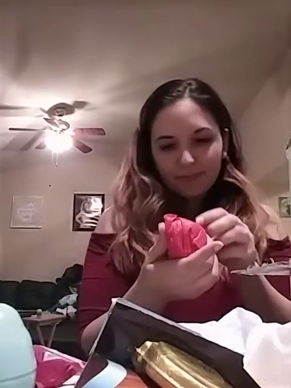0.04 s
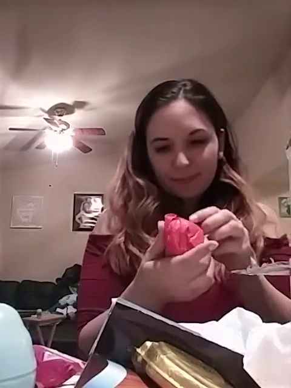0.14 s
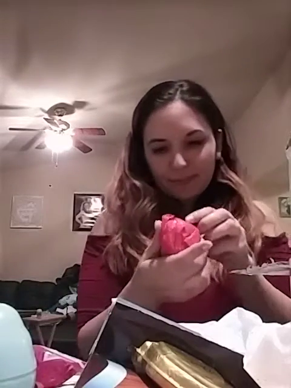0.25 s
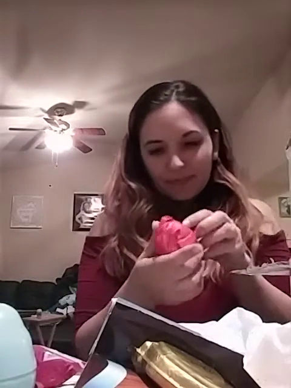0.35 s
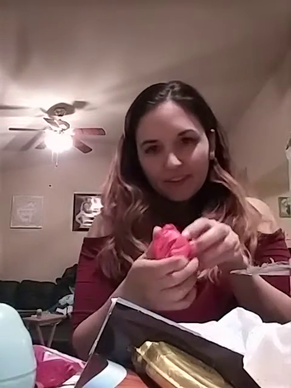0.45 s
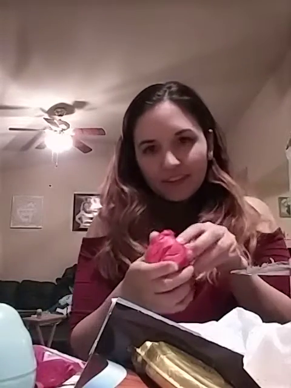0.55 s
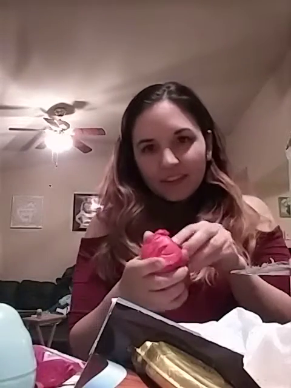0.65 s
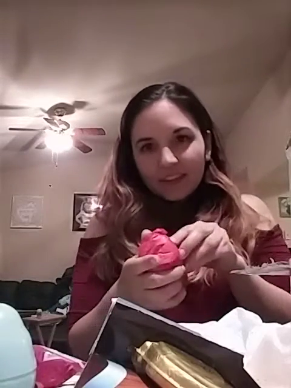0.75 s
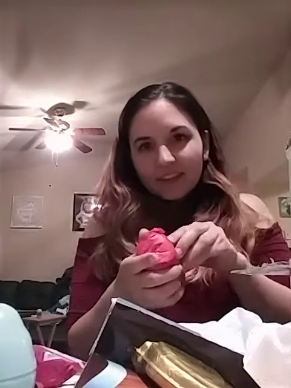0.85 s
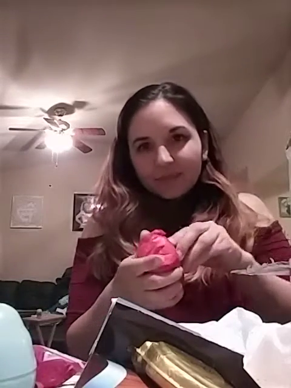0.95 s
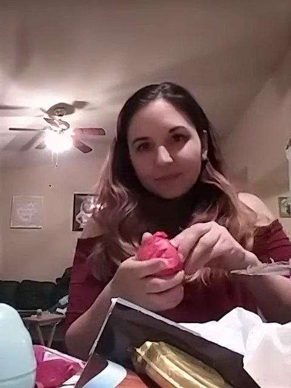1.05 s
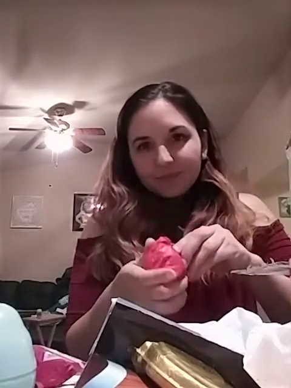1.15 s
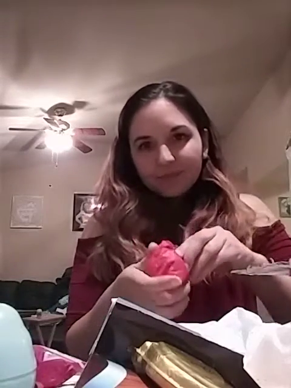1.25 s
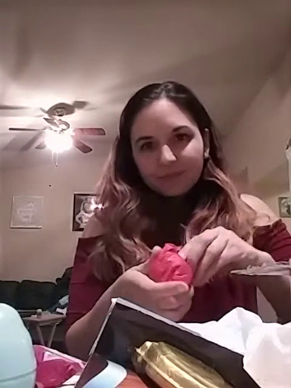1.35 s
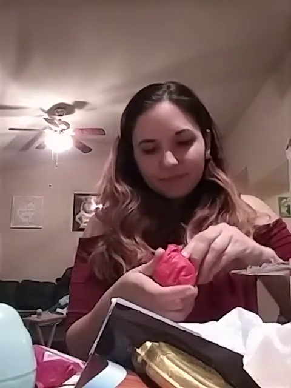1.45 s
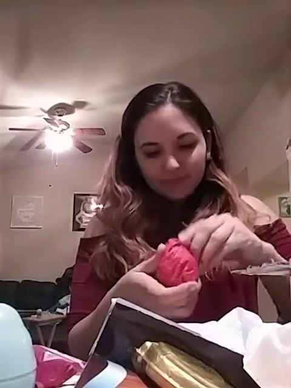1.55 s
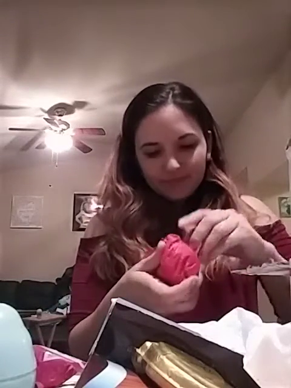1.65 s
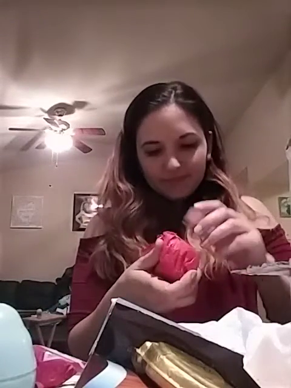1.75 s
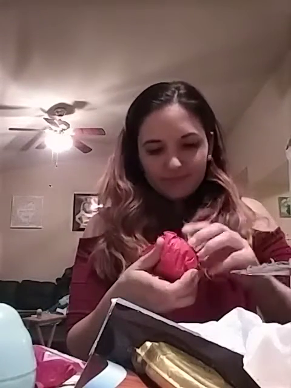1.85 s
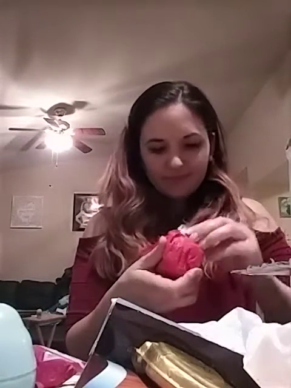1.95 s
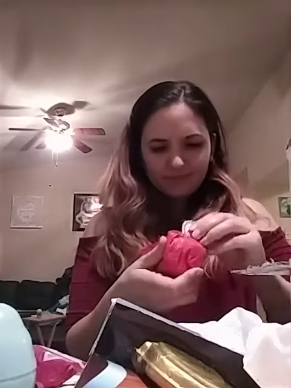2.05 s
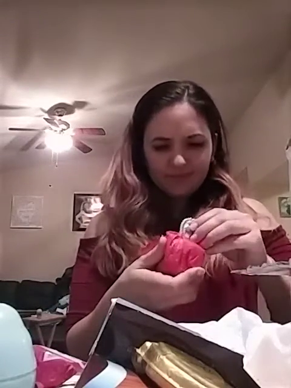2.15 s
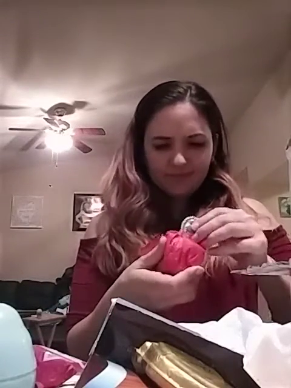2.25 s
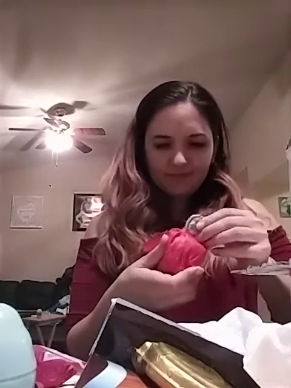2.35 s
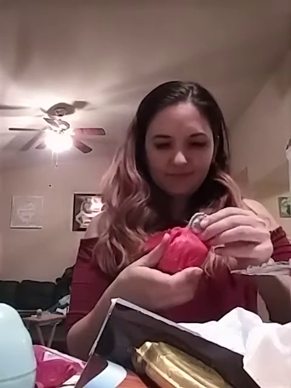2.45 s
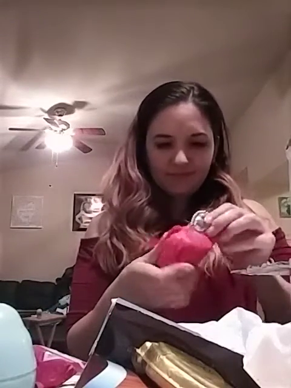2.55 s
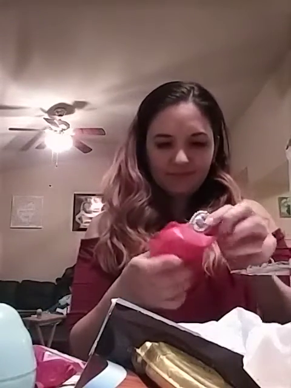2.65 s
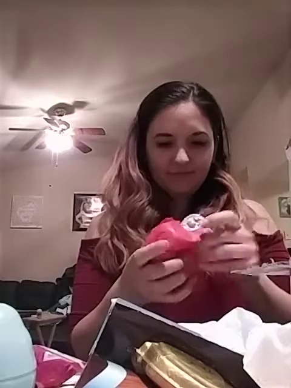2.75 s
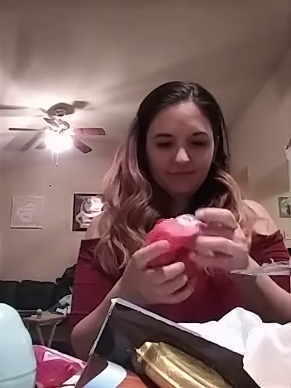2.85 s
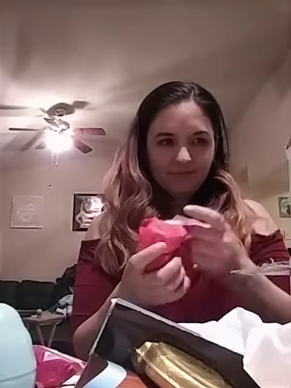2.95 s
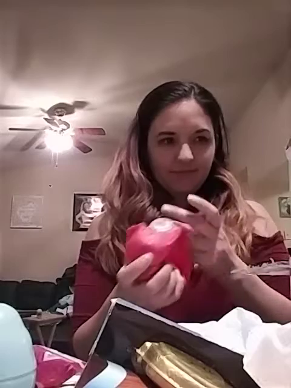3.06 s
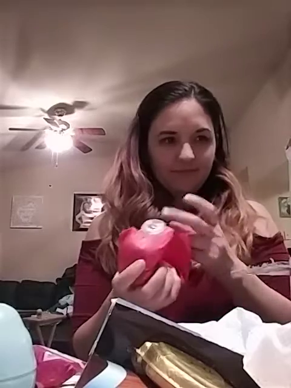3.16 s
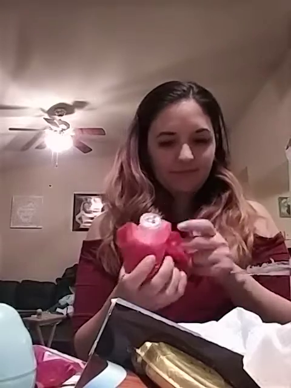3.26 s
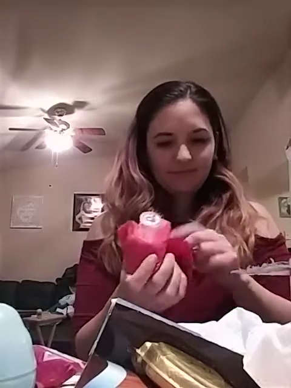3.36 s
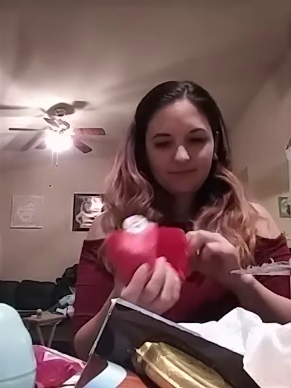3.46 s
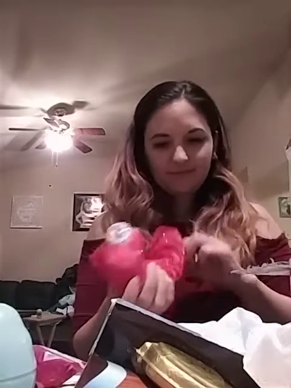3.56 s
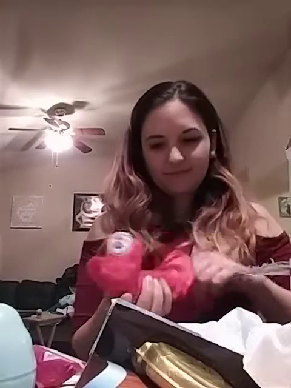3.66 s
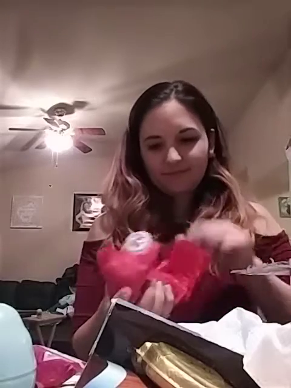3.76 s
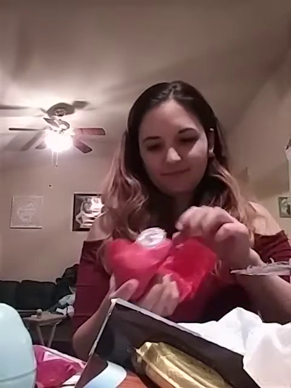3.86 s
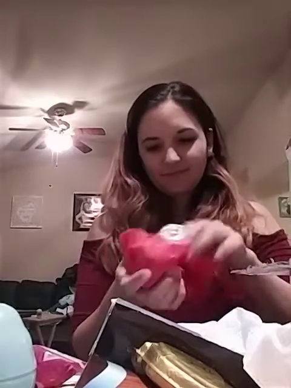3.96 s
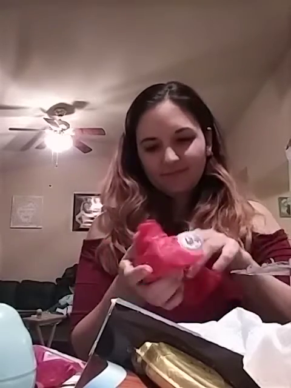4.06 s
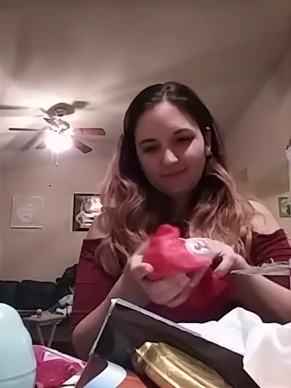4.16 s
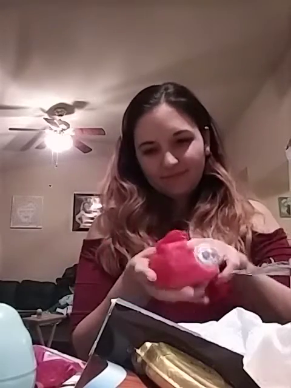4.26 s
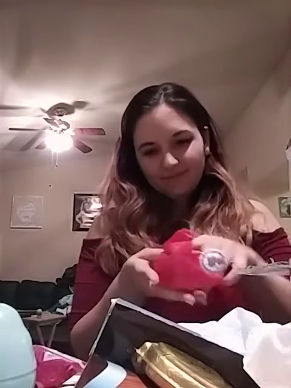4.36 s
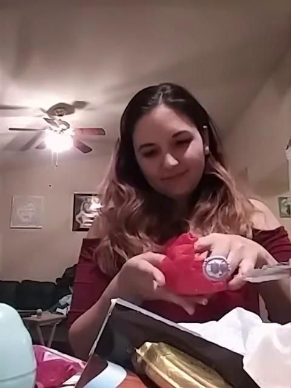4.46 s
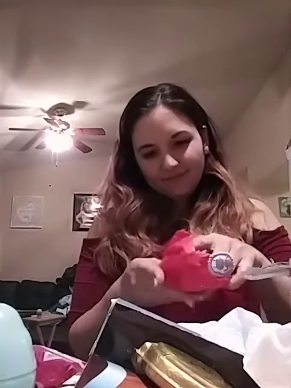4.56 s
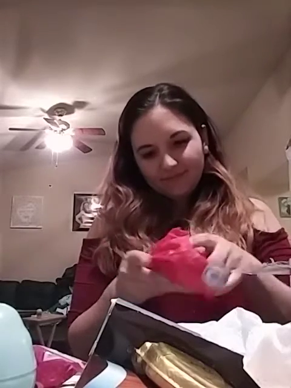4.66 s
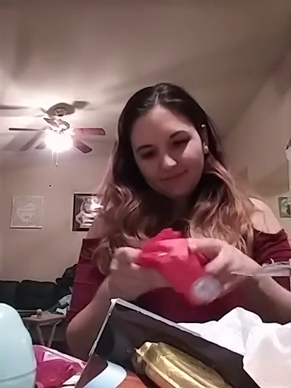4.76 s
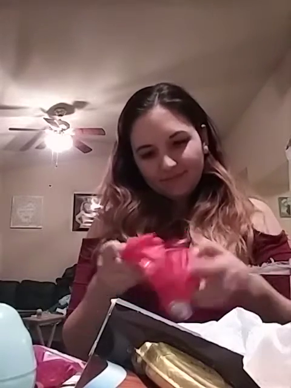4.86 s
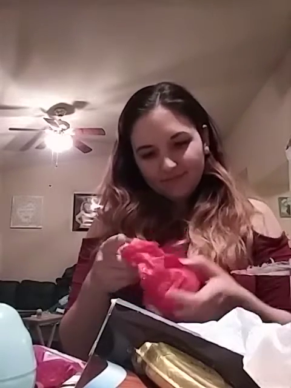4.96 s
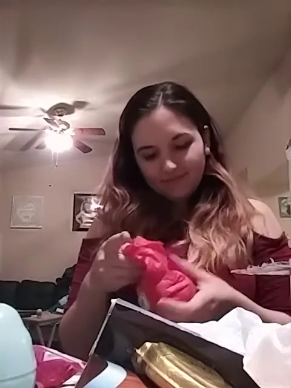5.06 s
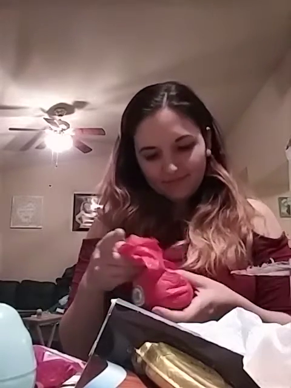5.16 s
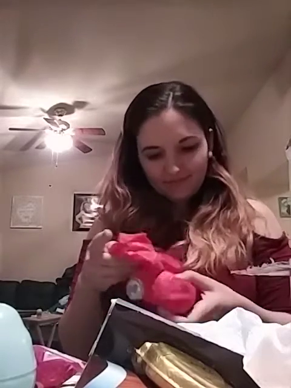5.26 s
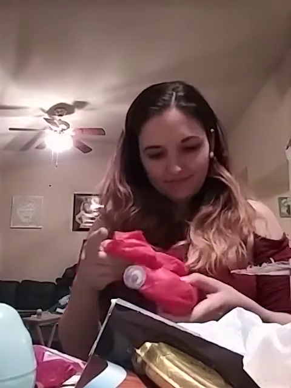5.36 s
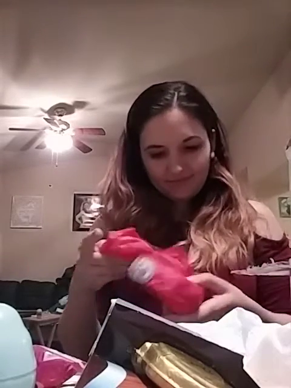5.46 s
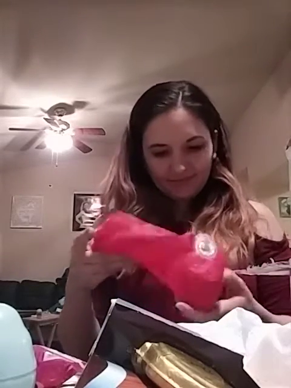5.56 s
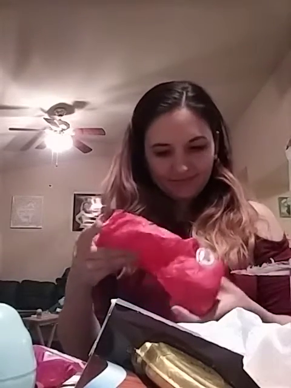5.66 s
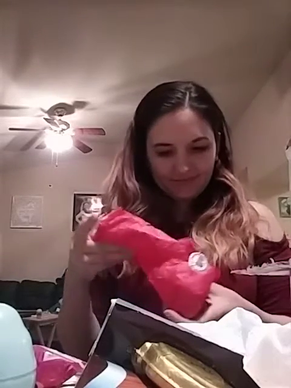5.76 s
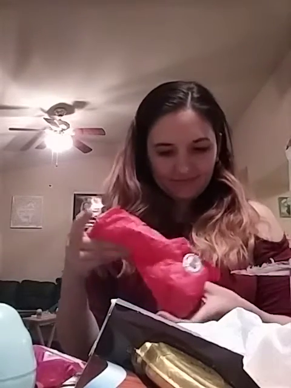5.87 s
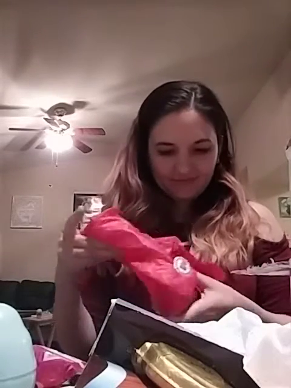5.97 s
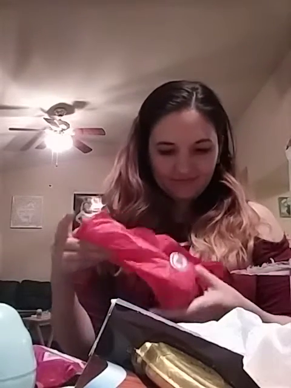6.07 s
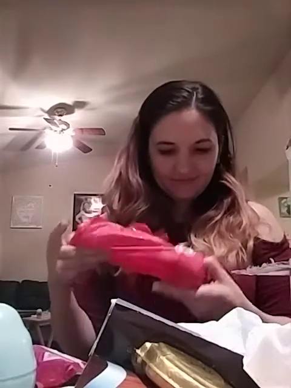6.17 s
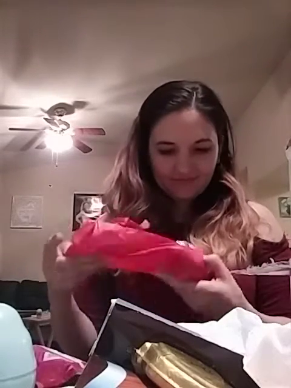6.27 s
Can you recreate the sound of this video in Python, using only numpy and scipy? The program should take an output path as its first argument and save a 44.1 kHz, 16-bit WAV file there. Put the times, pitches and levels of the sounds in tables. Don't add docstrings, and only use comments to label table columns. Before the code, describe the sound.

Close to a phone microphone in a quiet furnished room, fingers pick at a small tissue-paper parcel with thin rustles, bright ticks and a few hard snaps, strongest near one and a half seconds. From about three seconds the sheet is pulled open in nearly continuous, lively crinkling. Low muffled bumps pass through the table, and a faint fan hum lies underneath.

```python
import sys
import numpy as np
from scipy import signal
from scipy.fft import rfft, irfft
from scipy.io import wavfile
from scipy.ndimage import map_coordinates

SR = 44100
rng = np.random.default_rng(int(sys.argv[2]) if len(sys.argv) > 2 else 0)


def how_loud(loudness_db):
    steps = np.asarray(loudness_db, float) / 20
    return 10 ** steps


def bounce(signal):
    frames = np.transpose(np.atleast_2d(signal))
    limited = np.clip(frames, -1, 1)
    pcm = np.round(limited * 32767).astype(np.int16)
    wavfile.write(sys.argv[1], SR, pcm)


N = 278712
BLOCK = 64


def unit(x):
    return x / np.sqrt(np.mean(x ** 2) + 1e-20)


def along(points, hz):
    point_hz, value = np.transpose(points)
    return np.interp(np.log(hz + 1), np.log(point_hz + 1), value)


def wobble(rate):
    knots = rng.standard_normal(int(N * rate / SR) + 4)
    return map_coordinates(knots, [np.arange(N) * rate / SR])


def coloured(x, spectrum):
    size = 8192
    gain = np.maximum(how_loud(along(spectrum, np.fft.rfftfreq(size, 1 / SR))), 1e-4)
    cepstrum = irfft(np.log(gain))
    cepstrum[1:size // 2] *= 2
    cepstrum[size // 2 + 1:] = 0
    response = irfft(np.exp(rfft(cepstrum)))[:size // 2]
    return signal.fftconvolve(x, response)[:N]


def gestures(rows):
    peak_s, db, swell_s, fade_s = np.transpose(rows)[:4, :, None]
    lag_s = np.arange(0, N + BLOCK, BLOCK) / SR - peak_s
    side_s = np.maximum(np.where(lag_s < 0, swell_s, fade_s), 0.005)
    roundness = 1.16
    return how_loud(db - 10 * (abs(lag_s) / side_s) ** roundness) ** 2


def spread(coarse):
    return np.interp(np.arange(N), np.arange(len(coarse)) * BLOCK, coarse)


# frequency in Hz, level in dB per Hz.
AIR_COLOUR = [(24, -56), (40, -28), (154, -0.5), (208, -22), (310, -10), (399, -1), (802, -29), (1660, -34),
              (4850, -22), (6880, -33), (9290, -20), (15700, -19.5)]
# frequency in Hz, rms level in dB.
FAN_TONES = [(139, -74), (300, -65.5)]


def air():
    t = np.arange(N) / SR
    hum = np.zeros(N)
    for hz, db in FAN_TONES:
        level = how_loud(db + 2 + 0.5 * wobble(4.0))
        hum += level * np.sin(2 * np.pi * hz * t + 0.5 * wobble(4.8))
    level_db = -63 + 1.2 * wobble(4)
    return how_loud(level_db) * unit(coloured(rng.standard_normal(N), AIR_COLOUR)) + hum


# peak in seconds, level in dB, swell in seconds, fade in seconds.
KNOCKS = [(0.09, -61, 0.18, 0.2), (0.7, -62, .4, .12), (1.34, -46.5, .04, .035), (1.48, -47, 0.032, 0.043),
          (1.65, -59, .09, 0.094), (2.04, -45, .08, 0.043), (2.22, -58, 0.17, .15),
          (2.76, -49, 0.039, 0.029), (3.04, -49, 0.14, 0.036), (3.2, -51, .08, .08),
          (3.57, -53, 0.035, 0.15), (3.94, -50, 0.024, 0.045), (4.45, -59, .08, .3),
          (4.72, -54.5, .3, 0.17), (4.87, -44, 0.024, 0.085), (5.1, -53, .02, .055), (5.35, -60, 0.26, .15),
          (5.61, -44, .07, 0.038), (5.96, -55, 0.18, .06), (6.18, -51, 0.092, .1)]
# frequency in Hz, level in dB per Hz.
TABLE_BOOM = [(22, -28), (45, 1.5), (60, 1.5), (135, -1), (200, -1), (400, -31.5)]


def knocks():
    settled_db = -63.5
    level = np.sqrt(spread(gestures(KNOCKS).sum(0)) + how_loud(settled_db) ** 2)
    lumps = how_loud(1.7 * wobble(25)) * rng.standard_normal(N)
    return level * unit(coloured(lumps, TABLE_BOOM))


# frequency in Hz, time to fall by 60 dB in seconds.
ROOM_DECAY = [(200, 0.64), (2000, 0.05), (10000, 0.18)]


def room(x):
    hz, t, z = signal.stft(rng.standard_normal(SR // 3), SR, nperseg=256)
    fading = z * how_loud(-60 * t / along(ROOM_DECAY, hz)[:, None])
    tail = signal.istft(fading, SR, nperseg=256)[1]
    delayed = np.pad(x, (200, 0))
    return signal.fftconvolve(delayed, tail / np.linalg.norm(tail))[:N]


def creases(clump, per_s, spread_db, life_s, hush):
    chance, size = rng.random(N), rng.exponential(size=N)
    buckles = chance < per_s * clump / SR
    clicks = buckles * how_loud(spread_db * np.minimum(size, 3))
    burst = signal.lfilter([1], [1, -np.exp(-1 / (life_s * SR))], clicks)
    crackle = unit(burst * rng.standard_normal(N))
    return unit(crackle + hush * rng.standard_normal(N))


def facets(clump, low_hz, high_hz, sharpness, count):
    total = np.zeros(N)
    for hz in np.geomspace(low_hz, high_hz, count):
        taps = creases(clump, per_s=220, spread_db=3, life_s=0.0001, hush=0.69)
        ringing = signal.lfilter(*signal.iirpeak(hz, sharpness, SR), taps)
        total += np.sqrt(hz) * unit(ringing)
    return unit(total)


# frequency in Hz, level in dB per Hz.
FINE_COLOUR = [(2940, -51), (5000, -22.5), (6030, -19.5), (6760, -20.5), (9360, 1.5), (15700, -25.5)]
# frequency in Hz, level in dB per Hz.
FOLD_COLOUR = [(530, -17.5), (900, -6.5), (1660, -1.5), (1980, -1), (2920, -1.5), (3150, 0), (7000, -6),
               (9100, -7.5), (15400, -120)]
# frequency in Hz, level in dB per Hz.
PARCEL_COLOUR = [(120, -34), (200, -8), (268, -10), (346, -5), (417, -7.5), (484, 1), (546, -1.5), (598, 3),
                 (916, -2.5), (1200, -11.5), (1560, -8.5), (2640, -120)]
# time in seconds, tilt towards the treble in dB, hollow sound against fine creases in dB.
GRIP = [(0, -10, -18.5), (0.4, -1, -19.5), (0.7, -3.5, -15.5), (1.25, 2, -15), (1.38, 10, -19),
        (1.5, 9, -15.5), (1.68, -5, -15.5), (1.78, 8, -19), (1.95, -7.5, -5.5), (2.06, -6.5, -14.5),
        (2.15, -1, -15.5), (2.9, -4, -18.5), (3.15, -4, -15), (3.93, 2.5, -19.5), (4.45, -1.5, -19),
        (4.95, 1.5, -13.5), (5.4, 3.5, -17.5), (6.32, -0.5, -16)]
# peak in seconds, crackle level in dB, swell in seconds, fade in seconds, broad folds against fine creases in
# dB.
MOVES = [(0.084, -39, .07, 0.044, -13), (0.283, -39.5, 0.14, 0.2, -9.5), (0.42, -37, 0.16, 0.15, -8.5),
         (0.459, -23, .005, 0.018, -10.5), (0.617, -32.5, 0.15, 0.15, -6), (0.8, -36.5, .2, 0.16, -5.5),
         (0.945, -36.5, 0.14, 0.11, -3), (1.09, -38, 0.068, 0.069, -4), (1.213, -38.5, 0.0093, 0.064, -5.5),
         (1.32, -37.5, 0.033, 0.15, -7), (1.401, -17.5, 0.014, 0.035, -5.5),
         (1.54, -38.5, 0.16, 0.098, -7.5), (1.65, -37.5, 0.13, .05, -5), (1.695, -31.5, 0.023, 0.033, -8),
         (1.452, -25, 0.018, 0.02, -9), (1.895, -43.5, .012, .1, -4), (1.975, -30.5, 0.011, .06, -10),
         (2.035, -24.5, 0.056, 0.019, -7.5), (2.137, -34.5, 0.19, 0.13, -9), (2.362, -41, 0.11, 0.052, -10),
         (2.474, -31, 0.17, 0.026, -5.5), (2.555, -33, 0.074, 0.19, -8), (2.654, -30, 0.0042, 0.014, -14),
         (2.802, -28, 0.085, .11, -9),
         (2.962, -25, 0.022, 0.092, -8), (3.025, -23, 0.028, 0.022, -8), (3.113, -29.5, 0.057, 0.076, -6.5),
         (3.266, -28, 0.11, 0.06, -8), (3.414, -30.5, 0.12, 0.11, -2.5), (3.579, -26.5, 0.12, 0.17, -6),
         (3.72, -31.5, 0.09, 0.2, -5.5), (3.945, -27.5, 0.029, 0.13, -5.5), (4.1, -29, 0.082, 0.12, -7),
         (4.209, -28.5, 0.16, 0.034, -3), (4.38, -28, 0.21, .16, -7), (4.56, -27, 0.074, 0.24, -5.5),
         (4.76, -25.5, 0.13, 0.13, -4.5), (4.89, -23.5, 0.11, 0.03, -6.5), (5.049, -29, 0.11, 0.09, -5.5),
         (5.207, -26, 0.13, 0.18, -8), (5.37, -28.5, 0.33, 0.19, -6), (5.51, -24.5, 0.11, 0.13, -3.5),
         (5.612, -24, 0.15, 0.036, -5.5), (5.7, -41, 0.048, 0.17, -6), (5.924, -26.5, .14, 0.11, -5),
         (6.095, -27, 0.057, 0.095, -3), (6.201, -22.5, 0.12, 0.11, -8), (4.97, -37, 0.059, 0.073, -8)]


def crinkle():
    moves = MOVES
    power = gestures(moves)
    still_db = -70
    total = power.sum(0) + how_loud(still_db) ** 2
    fine_db = spread(10 * np.log10(total))
    fold_db = spread(np.transpose(moves)[4] @ power / total)
    grip_s, *grip = np.transpose(GRIP)
    tilt_db, hollow_db = [np.interp(np.arange(N) / SR, grip_s, column) for column in grip]

    busy = how_loud(0.25 * (fine_db + 32))
    clump = busy * how_loud(1.3 * wobble(60) + 2.5 * wobble(150))
    shared = creases(clump, per_s=1800, spread_db=2.0, life_s=0.00024, hush=0.9)
    patches = facets(clump, low_hz=1010, high_hz=15400, sharpness=3.95, count=12)
    deep = creases(clump, per_s=200, spread_db=5.5, life_s=0.0018, hush=0.72)

    fine = unit(coloured(shared + 0.9 * patches, FINE_COLOUR))
    folds = unit(coloured(shared + patches, FOLD_COLOUR))
    hollow = unit(coloured(shared + 0.87 * deep, PARCEL_COLOUR))

    slack = signal.lfilter(*signal.butter(1, 2200, fs=SR), folds)
    tilted = how_loud(-tilt_db) * slack + how_loud(tilt_db / 2) * (folds - slack)
    mix = fine + how_loud(fold_db) * tilted + how_loud(hollow_db) * hollow
    return how_loud(fine_db + 1.02 * wobble(30)) * mix


# start in seconds, burst energy in dB, fold pitch
# in Hz, fold ring against the burst in dB, thump against the burst in dB.
SNAPS = [(0.1291, -7.5, 3750, -28, -32.5), (0.3432, -12, 5030, -16, -30), (0.4614, -12, 1640, -4, -22),
         (0.4625, -4, 1470, -17.5, -43), (0.8305, 0, 5430, -22, -45), (1.282, -20, 3500, -11, -18),
         (1.306, -23.5, 2300, -0.5, -15), (1.3352, -12, 1220, -10.5, -19),
         (1.3946, -8.5, 3900, 3.5, -23), (1.3961, -2.5, 3540, 4, -19), (1.4027, 3.5, 3600, -13, -34),
         (1.4481, -4.5, 4590, -8, -25), (0.7567, -11, 1990, -14, -35), (1.6816, -4, 3420, -11, -32),
         (1.7581, -20.5, 4570, -3, -26.5), (1.8749, -5.5, 4730, -19, -41), (1.970, -16, 1410, 1, -18),
         (1.9971, -11, 1620, -1.5, -22), (2.1285, -10.5, 2650, -15, -29),
         (2.2769, -22.5, 1490, -2.5, -5), (0.176, -18, 2620, -21, -33.5),
         (2.6517, 0.5, 2900, -22, -52), (2.7262, -11.5, 2760, -16, -20.5),
         (2.7746, -2, 1480, -21, -37),
         (2.801, -12, 1870, -14, -17), (2.782, -7, 2070, -20.5, -23.5),
              (3.0201, -1.5, 5230, -8.5, -27), (3.1114, -5, 1750, -11.5, -20), (3.1687, -1, 3130, -24, -45),
              (3.212, -5, 4360, -18, -31), (3.259, -2.5, 1660, -18, -41), (3.5632, -12, 2030, -18, -23),
              (3.8377, -5.5, 4670, -36, -37), (3.912, -7, 1654, -24.5, -34),
              (3.9542, -1.5, 4930, -14.5, -40), (3.9933, 0, 2730, -25, -34), (4.279, -14, 5900, -4.5, -24),
              (4.378, -5, 5040, -17, -38), (4.564, -11, 1520, -24, -22), (5.037, -10, 5800, -13, -18),
              (5.0934, 3, 5810, -23, -29.5), (5.599, -8, 1620, -9, -24), (5.7711, -10, 3440, -15, -20),
              (5.92, -6.5, 4080, -19, -20), (5.959, -7, 2700, -10.5, -20), (6.0876, -6.5, 1480, -7.5, -28),
              (6.1604, -10, 5360, -5, -23), (6.2047, -7, 3190, -23, -23)]
# start in seconds, burst energy in dB, fold pitch in Hz.
TICKS = [(0.0685, -20, 4000), (0.455, -8.5, 2600), (0.689, -19, 3000), (0.9473, -14, 3750),
         (1.055, -18, 3720), (1.075, -16, 3970), (1.2033, -21.5, 2620), (1.5052, -12, 3340),
         (1.564, -18, 4350), (1.631, -15, 1600), (1.8577, -34, 4220), (2.0045, -7, 1490),
         (2.359, -19, 3760), (2.4738, -11, 4270), (2.5456, -14, 2430), (2.636, -17, 2620),
         (2.717, -13, 1490), (2.81, -13, 2190), (3.275, -7, 4000), (4.4867, -15, 3460), (5.207, -6, 3900),
         (5.741, -16, 5340), (5.8157, -17.5, 1724), (6.018, -23, 1790), (6.0487, -18, 4880)]


def snaps():
    t = np.arange(600) / SR
    bright, ring, thump = np.zeros((3, N + len(t)))
    tick_fold_db, tick_thump_db = -14.5, -28
    rows = SNAPS + [(*tick, tick_fold_db, tick_thump_db) for tick in TICKS]
    for start_s, db, hz, fold_db, thump_db in rows:
        burst_grit, fold_grit = rng.standard_normal((2, len(t)))
        start = round(start_s * SR)
        at = slice(start, start + len(t))
        burst = how_loud(-60 * t / 0.0054) * (1 - np.exp(-t / 0.000089)) * burst_grit
        bright[at] += how_loud(db) * burst / np.linalg.norm(burst)
        fold = how_loud(-60 * t / 0.006) * (np.sin(2 * np.pi * hz * t) + 1.1 * fold_grit)
        ring[at] += how_loud(db + fold_db) * fold / np.linalg.norm(fold)
        thump[start] += how_loud(db + thump_db)
    bright = signal.lfilter([1, 0.5, 0], [1], np.diff(bright, prepend=0))
    burst_sound = how_loud(9.5) * coloured(bright, FINE_COLOUR)
    fold_sound = how_loud(16) * coloured(ring, FOLD_COLOUR)
    thump_sound = how_loud(28) * coloured(thump, PARCEL_COLOUR)
    return burst_sound + fold_sound + thump_sound


def scene():
    paper = crinkle() + snaps()
    answer = how_loud(-15) * room(paper)
    return (paper + answer + knocks() + air())[None]


def roll_off(x):
    return signal.sosfilt(signal.butter(12, 16820, fs=SR, output="sos"), x)


def record(dry):
    rounded = dry / (1 + abs(dry / 0.95) ** 6) ** (1 / 6)
    hz = np.fft.rfftfreq(N, 1 / SR)
    low_hz, top_hz = 45, 15750
    gain = (hz < top_hz) * hz ** 4 / (hz ** 4 + low_hz ** 4)
    mix = irfft(rfft(rounded) * gain, N)
    return roll_off(mix)


dry = scene()
out = record(dry)
bounce(out)
```